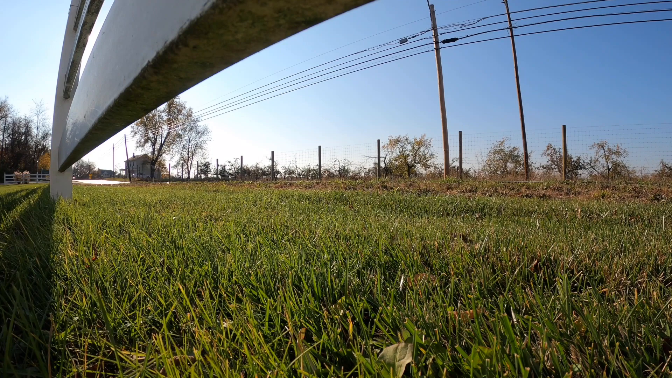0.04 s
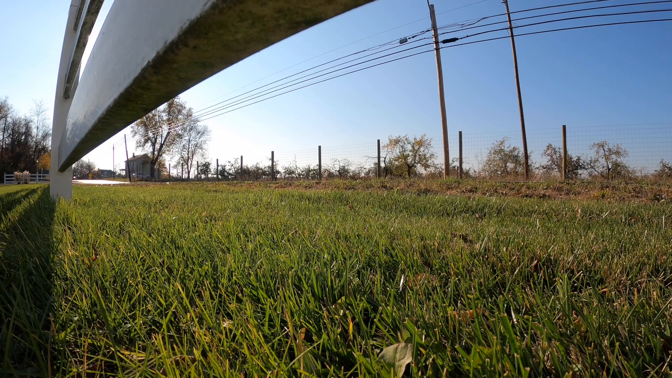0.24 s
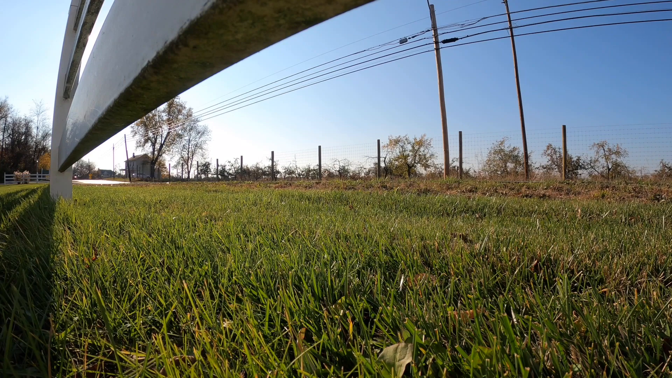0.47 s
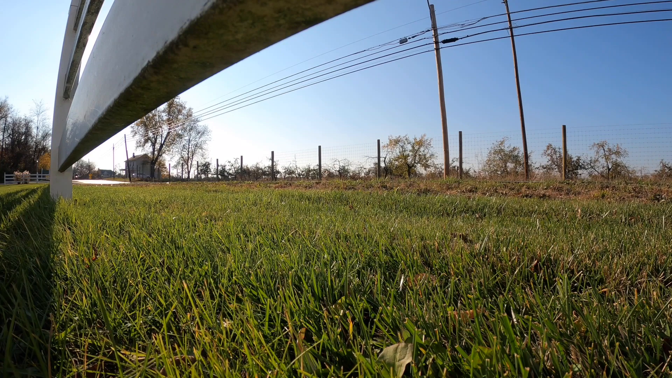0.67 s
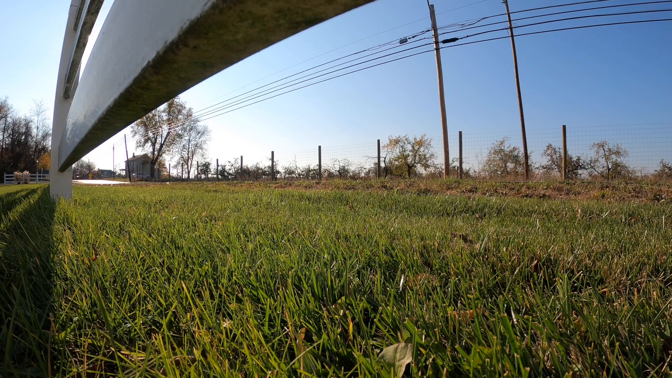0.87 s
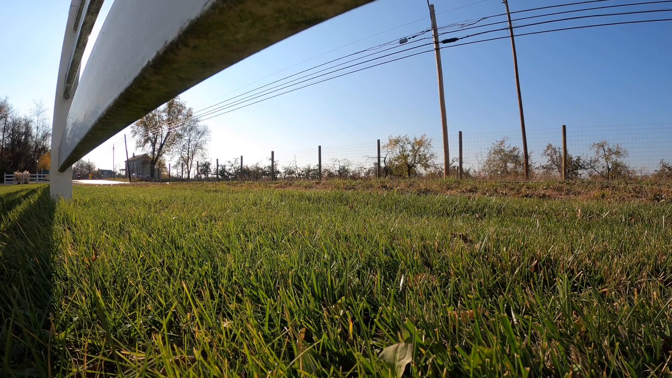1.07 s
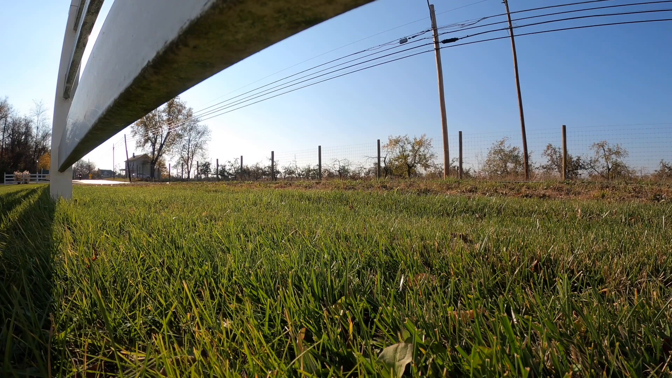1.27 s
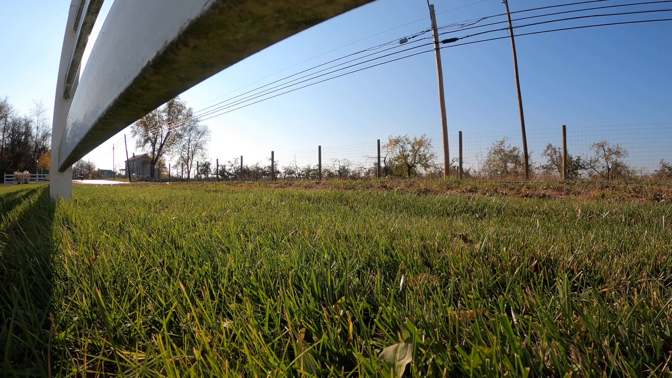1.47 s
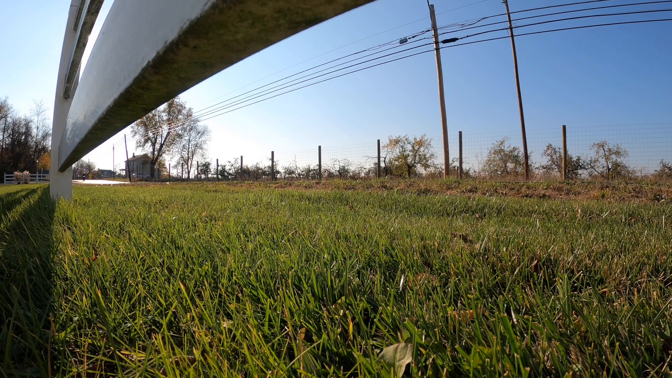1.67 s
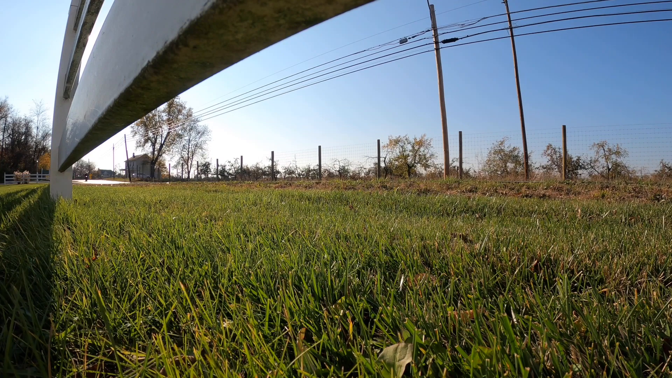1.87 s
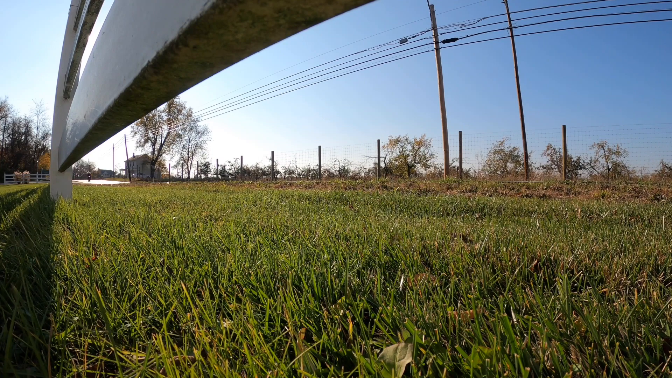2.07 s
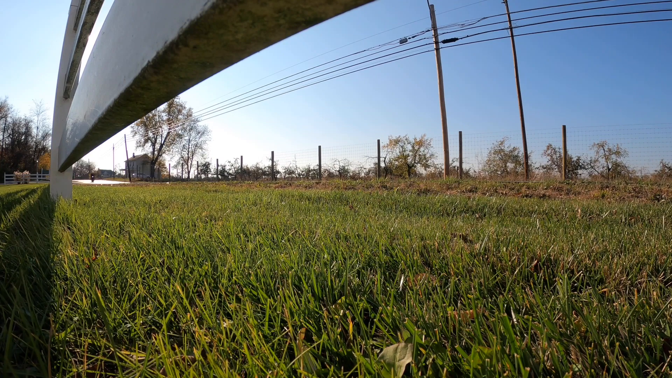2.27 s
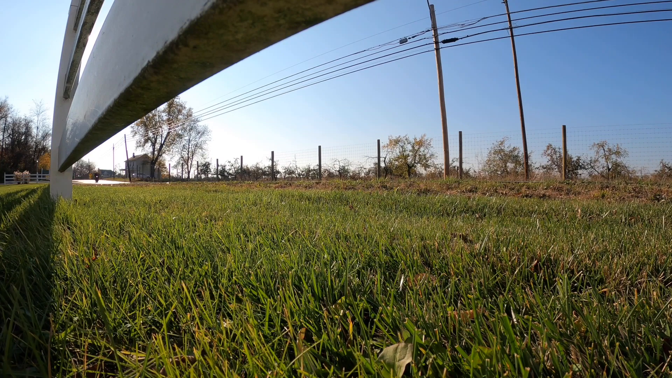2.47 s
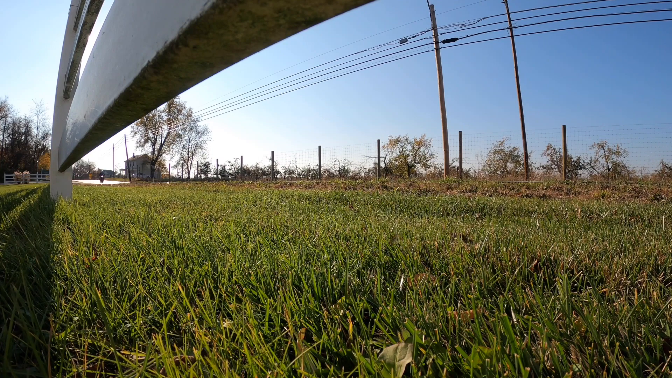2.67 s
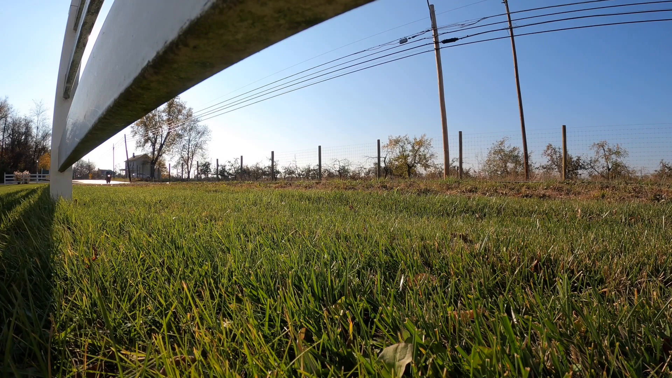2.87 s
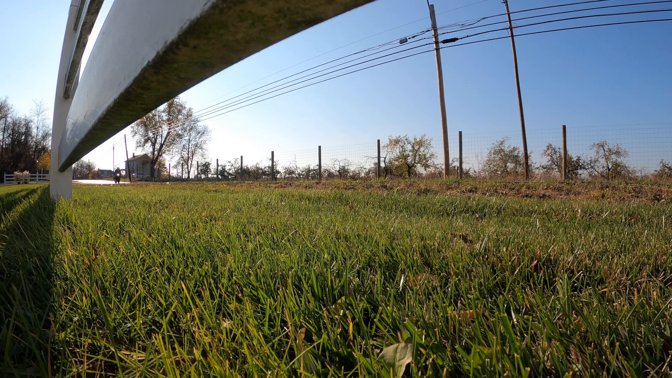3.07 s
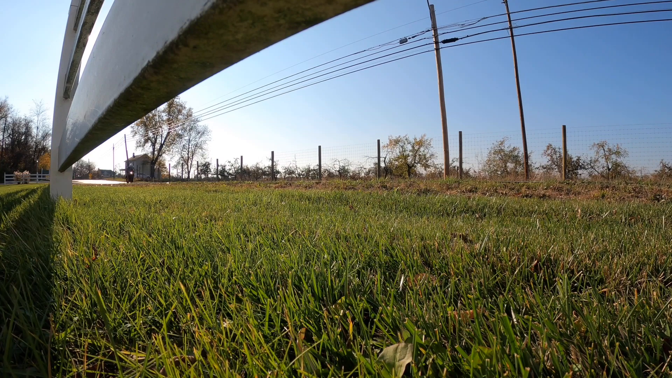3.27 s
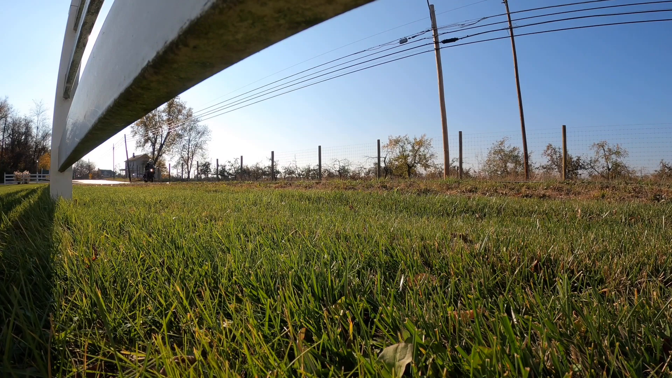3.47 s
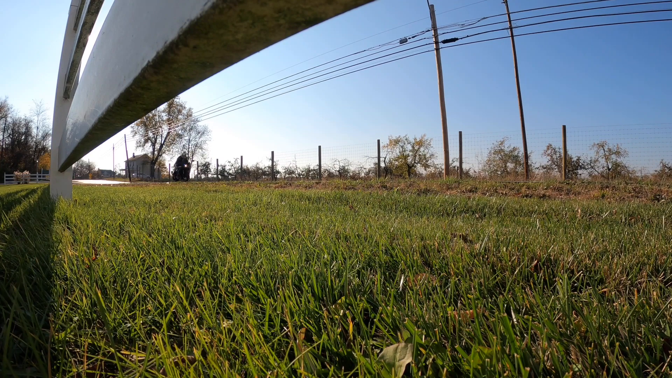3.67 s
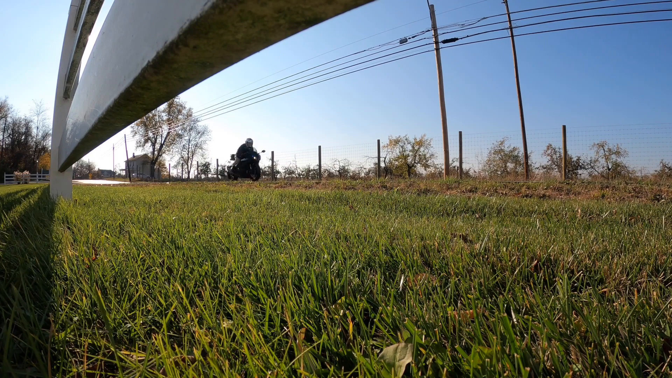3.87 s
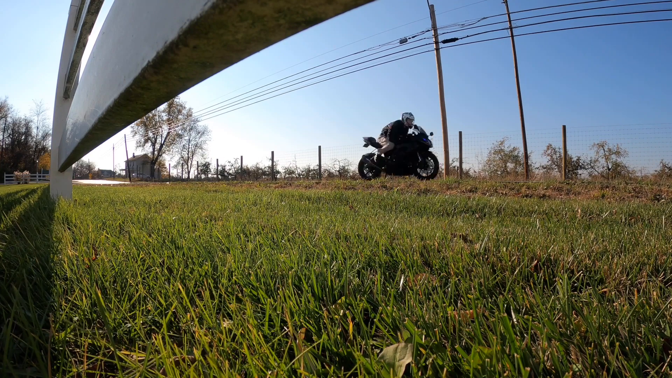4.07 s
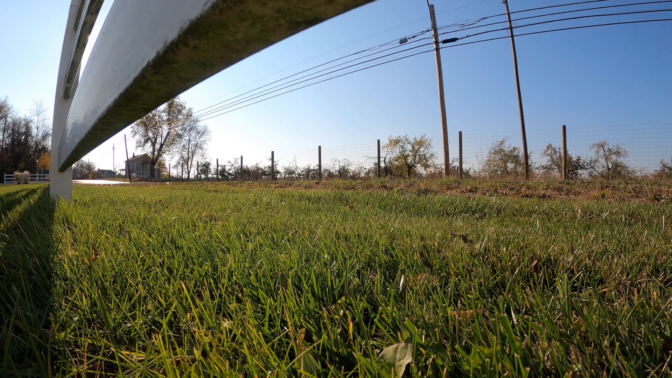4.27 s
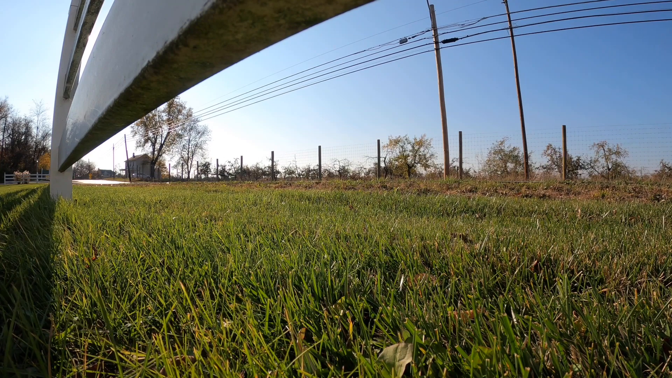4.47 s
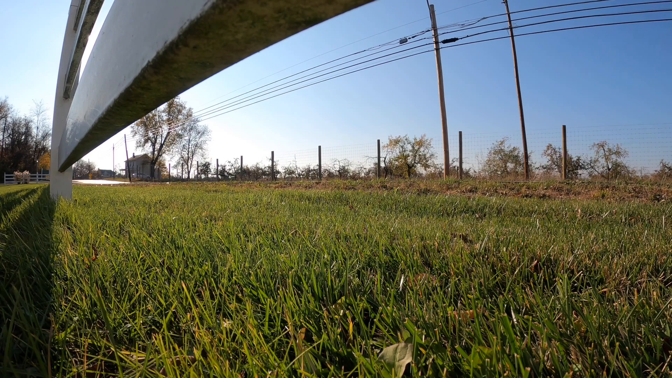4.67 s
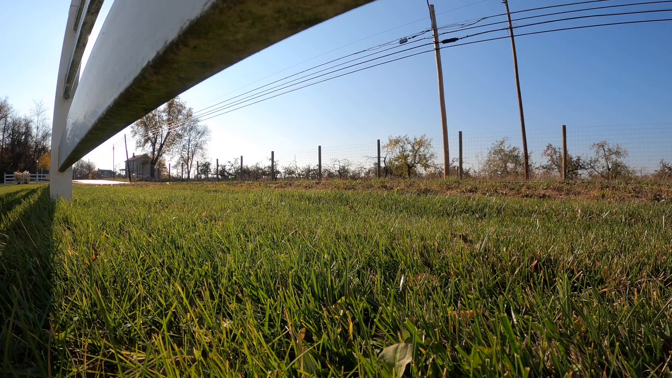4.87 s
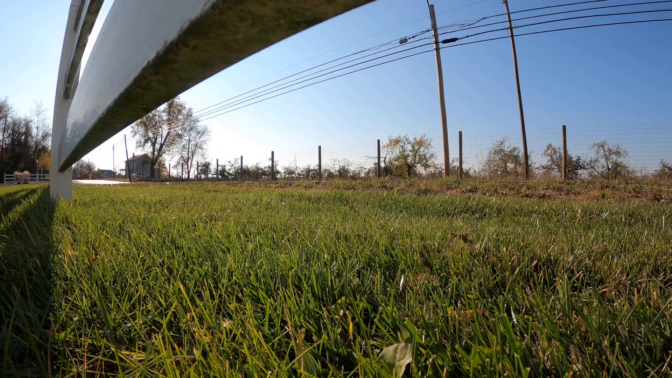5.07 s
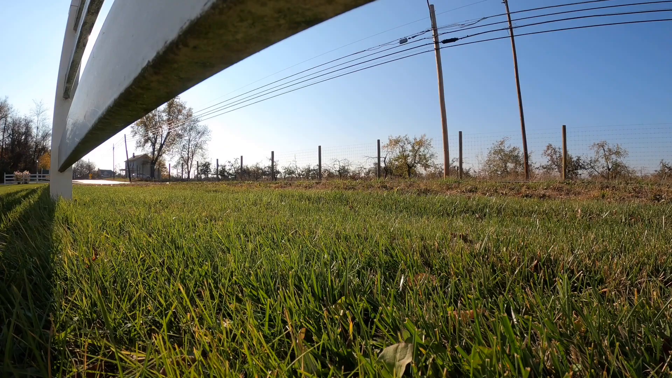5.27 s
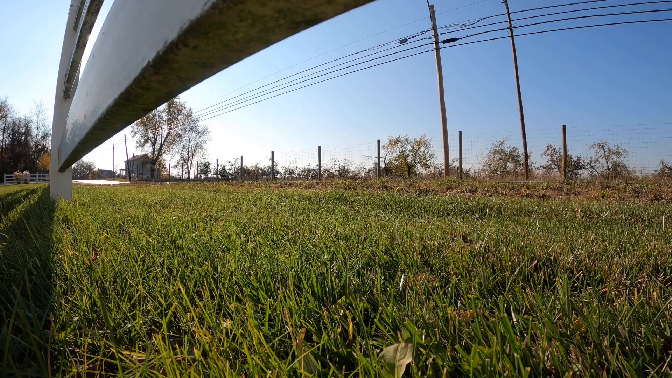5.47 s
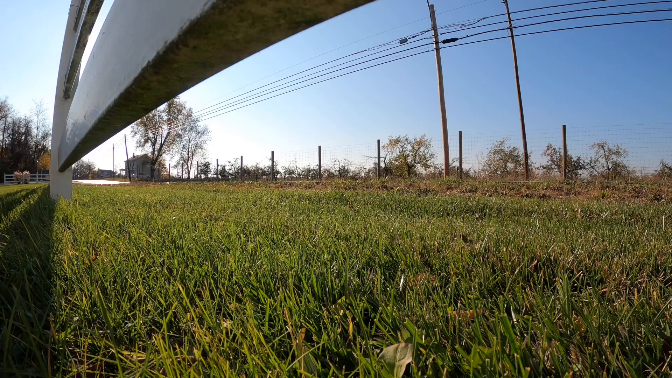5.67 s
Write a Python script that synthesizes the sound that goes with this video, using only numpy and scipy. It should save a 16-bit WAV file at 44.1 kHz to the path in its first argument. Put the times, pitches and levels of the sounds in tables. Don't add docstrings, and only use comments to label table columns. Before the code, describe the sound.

A mono outdoor pass-by heard from grass beside a rural road. From 0 to 2 seconds, low wind rumble, fluttering gusts and small pops press on the dull microphone, while a faint, smooth motorcycle hum climbs steadily in pitch and grows. At about 2.35 seconds a quick upshift dips the power and the revs twitch; a stronger wind pop lands near 2.8. The tone swells, nearly pure and singing, with another shift at 3.25. Tyre hiss, intake roar and a high chain whine rise sharply around 4. At 4.05 a deep ignition cut, short metallic ring, thud and jerk of revs mark a hard shift just before the closest pass at 4.3. Pitch and whine fall as the bike passes; coarse exhaust rasp follows. The hiss drops away quickly, the lower engine note fades, a final clipped shift comes at 5.27, and the receding drone continues to 5.7 under light wind.

```python
import sys
import numpy as np
from scipy import signal
from scipy.io import wavfile
from scipy.ndimage import uniform_filter1d

SR = 44100
rng = np.random.default_rng(int(sys.argv[2]) if len(sys.argv) > 2 else 0)


def volts_from_db(level):
    exponent = np.asarray(level, float) / 20
    return 10 ** exponent


def put_to_file(sound):
    columns = np.atleast_2d(sound).T
    safe = np.clip(columns, -1, 1)
    whole_steps = np.round(safe * 32767)
    wavfile.write(sys.argv[1], SR, whole_steps.astype(np.int16))


N = 252693

# time in seconds, rate in Hz.
ROAD_SPEED = [(0, 168.7), (.36, 173.1), (.72, 179.5), (1.08, 188.8), (1.44, 202.7), (1.8, 223),
              (2.05, 241.2), (2.35, 260.3), (2.55, 262.6), (3.24, 298.3), (3.4, 299.8), (3.7, 311.5),
              (4.04, 323.6), (4.3, 327.3), (4.7, 330.8), (5.1, 336), (5.265, 346.5), (5.73, 351.4)]
# start in seconds, ratio of new to old revs.
UPSHIFTS = [
    (2.35, 0.88),
    (3.24, 0.88),
    (4.04, .887),
    (5.265, .904),
]
SHIFT_S = .045
# peak in seconds, rate change in Hz, settling in seconds.
SNATCHES = [
    (2.421, 33, .024),
    (2.486, -16, 0.02975),
    (3.301, 23, 0.0181),
    (3.346, -11, .025),
    (4.101, 43.5, .02),
    (4.162, -13.5, .015),
    (5.322, -20.5, 0.0059),
    (5.342, 24, 0.0078),
]
# time in seconds, depth in dB, recovery in seconds.
POWER_CUTS = [
    (2.351, -9, 0.019),
    (2.541, -5, 0.017),
    (3.242, -5, 0.015),
    (4.041, -16, 0.032),
    (4.128, -5, 0.047),
    (4.147, -4, 0.021),
    (4.35, -1.5, 0.032),
    (5.267, -16, 0.026),
]

PASS_S, PASS_SPAN_S, MACH = 4.32, 0.14, .07
BEAM_S, BEAM_SPAN_S = 4.416, 0.34
ABREAST_S, TURN_S, CHAIN_S = 4.017, 0.041, 4.195

# time in seconds, level in dB.
FIRING_TONE = [(0, -35), (.28, -32.5), (.8, -29.5), (1.2, -25.5), (1.6, -25), (2.0, -20), (2.25, -18),
               (2.55, -18), (2.75, -19), (2.84, -14), (2.95, -13), (3.4, -12), (4.08, -10.5), (4.45, -11),
               (4.65, -14.5), (4.87, -17.5), (5.2, -22), (5.73, -23)]
EXHAUST_ORDERS = np.array([2, 3, 5, 6, 7, 8, 9, 10, 11, 12, 13, 14, 15, 16, 18, 20, 22, 24, 28]) / 4
ORDER_FRONT_DB = [-16.5, -1.5, -0.5, -1, -15.5, -1.5, -27.5, -20, -29, 3, -17, -14, -21, -4.5, -10, -4.5,
                  -18.5, -8, -19.5]
ORDER_REAR_DB = [-9.5, -16, -3, -3, -19.5, -0.5, -13, -11.5, -21, 1.5, -9, -19.5, -15.5, -36, -29.5, -23,
                 -30, -28, -23.5]
# dB nearest from the front, share of distance loss, dB in the tailpipe's beam, share of beam loss
UNEVEN, SECOND, UPPER = (-32, 0.56, -26.5, 1.43), (-44.5, 0.04, -25, 3), (-37.5, 1.1, -37.5, 2.5)
# centre in seconds, gain in dB, length in seconds.
SECOND_BEATS = [
    (0.904, 3, .25),
    (2.9, 4, .15),
    (4.03, 9.5, 0.084),
    (4.149, 7, 0.03),
    (4.522, 3.5, 0.048),
    (5.219, -13.5, .12),
    (5.5, 10.5, 0.18),
]
# centre in seconds, gain in dB, length in seconds.
UPPER_ORDER_BEATS = [
    (1.653, 8.5, 0.13),
    (1.95, 4.5, 0.064),
    (2.26, 9, 0.074),
    (2.754, 2.5, .1),
    (3.1, 2.5, 0.14),
    (4.32, 3, 0.052),
    (5.15, 2.5, .05),
    (5.5, 5, 0.13),
]
RELIGHT_DB, RELIGHT_S, RELIGHT_SPAN_S = -8, .06, .045
RASP_DB, RASP_SHARE, RASP_LOW_HZ, RASP_HIGH_HZ = -46, 1.97, 330, 788

# time in seconds, level in dB.
RUNNING_NOISE = [(0, -69.5), (.35, -68), (.83, -66.5), (1.5, -58), (2.68, -55.5), (2.86, -50.5),
                 (3.05, -52), (3.7, -51), (3.91, -45.5), (4.04, -41.5), (4.12, -35.5), (4.3, -35.5),
                 (4.55, -42.5), (4.79, -55), (5.26, -58.5), (5.31, -63.5), (5.5, -61), (5.73, -60.5)]
# frequency in Hz, level in dB per Hz.
RUNNING_COLOUR = [(290, -31.5), (500, -8.5), (723, -11.5), (1120, -13.5), (1240, -10.5), (1490, -14),
                  (1840, -10.5), (2150, -20), (2740, -15), (3150, -18.5), (4820, -20.5), (7700, -30),
                  (14800, -74.5)]
LOW_NEAR_DB, LOW_FAR_DB, LOW_SLOPE = -19.5, 0.5, 1
MID_FRONT_DB, MID_REAR_DB = -1.5, -3.5
TREBLE_DB, TREBLE_SLOPE = 1, 0.34
# centre in seconds, gain in dB, length in seconds.
INTAKE_ROAR = [(.05, 12.5, .15), (.95, -9, .22), (1.4, 6, 0.28), (1.948, 3, .25), (2.6, 6.5, 0.36),
               (2.819, 6, 0.061), (2.993, 3.5, 0.17), (3.5, 5.5, .15), (4.171, 10, 0.048), (4.8, 0, 0.098),
               (5.197, -2.5, 0.12), (5.6, 0.5, .2)]
# frequency in Hz, width in Hz, share added.
FAIRING_CAVITIES = [(1875, 260, 0.72), (1464, 230, -0.48), (3740, 130, 0.22)]
# time in seconds, pitch in
# Hz.
WHINE_PITCH = [(0, 3450), (1.2, 3900), (2.3, 4750), (2.8, 4900), (4.0, 4950), (4.18, 4700), (4.45, 4200),
               (5.73, 4180)]
# multiple of its pitch, width in Hz, front level in dB, rear level in dB.
WHINE_BANDS = [(1, 260, -8, -3.5), (1.07, 170, -18, -10.5), (.78, 240, -16.5, -6), (.55, 230, -14.5, -12.5),
               (.4, 110, -14.5, -14), (1.19, 77, -27.5, -15), (.93, 83, -19.5, -7.5), (.72, 52, -23, -17),
               (.64, 60, -21.5, -19)]

# start in seconds, level in dB, pitch in Hz, length in seconds.
DOG_CLANG = [
    (4.034, -36, 995, 0.063),
]
# start in seconds, peak in dB, start pitch in Hz, end pitch in Hz, length in seconds.
PORT_POPS = [(0.622, -37, 146, 302, 0.015), (0.798, -31, 200, 420, 0.012), (0.855, -31, 202, 503, 0.014),
             (0.884, -31, 200, 420, .016), (0.912, -32, 178, 425, 0.047), (1.011, -33, 203, 554, 0.004),
             (1.09, -32.5, 304, 600, 0.009), (1.094, -41, 120, 450, 0.01), (1.179, -21.5, 176, 330, 0.013),
             (1.188, -23.5, 442, 850, 0.012), (1.199, -37, 480, 800, 0.016), (1.248, -36, 617, 900, 0.013),
             (1.225, -26.5, 280, 560, 0.026), (1.451, -34, 199.5, 400, 0.018), (2.036, -27, 98, 400, 0.012),
             (2.786, -23, 131, 262, 0.017), (2.794, -12.5, 121.7, 750, 0.027),
             (4.059, -15.5, 189, 137, 0.045)]
# time in seconds, level in dB.
BREEZE = [(0, -30.5), (1.0, -35.5), (2.2, -41), (3.4, -31), (4.2, -38.5), (5.73, -38)]
# peak in seconds, peak level in dB, length in seconds.
WIND_GUSTS = [(0.199, -24, 0.015), (0.352, -34, 0.054), (0.56, -46, 0.028), (0.629, -23.5, 0.034),
              (0.75, -24, 0.069), (0.921, -22, 0.082), (1.134, -24.5, .1), (1.3, -29.5, 0.21),
              (1.509, -28.5, .06), (1.79, -27, 0.16), (1.894, -25, .04), (2.051, -24, 0.097),
              (2.243, -31, 0.073), (2.417, -28, 0.028), (2.515, -33, 0.016), (2.799, -19.5, 0.023),
              (3.052, -32.5, 0.065), (3.14, -26, .03), (3.46, -36, 0.046), (3.33, -26.5, 0.053),
              (3.62, -29.5, .06), (3.75, -35.5, 0.035), (4.18, -30.5, .04), (4.819, -32, 0.075),
              (5.024, -31, .07), (5.45, -37.5, 0.1), (5.63, -36, .03)]
# frequency in Hz, level in dB per Hz.
RUMBLE_COLOUR = [(15, -4.5), (30, -3), (65, 0.5), (110, -4.5), (170, -5.5), (260, -12.5)]
# frequency in Hz, level in dB per Hz.
FLUTTER_COLOUR = [(120, -11.5), (200, -3), (350, -7), (550, -18), (900, -30), (1500, -43)]
GUST_RISE, FLUTTER_DB = .6, -21
AUDIBLE_DB, AUDIBLE_ABOVE_HZ = -107.5, 7800


def rms_one(x):
    return x / np.sqrt(np.mean(x ** 2) + 1e-20)


def in_time(rows):
    s, *columns = np.transpose(rows)
    return [np.interp(np.arange(N) / SR, s, c) for c in columns]


def drift(rate):
    r = np.exp(-80 * np.pi * rate / SR)
    slow = signal.lfilter([1], [1, -2 * r, r * r], rng.standard_normal(N // 40 + 2002))[2000:]
    return np.interp(np.arange(N) / 40, np.arange(len(slow)), rms_one(slow))


def band_noise(low, high):
    sos = signal.butter(4, [low, high], "band", fs=SR, output="sos")
    return rms_one(signal.sosfilt(sos, rng.standard_normal(N)))


def bands(colour, patchy_db, rate):
    hz_at, db_at = np.transpose(colour)
    edges = hz_at[0] * 2 ** np.arange(0, np.log2(hz_at[-1] / hz_at[0]) + .1, 1 / 3)
    white = rng.standard_normal((2, N + SR // 4))
    together = drift(rate)
    for k, (low, high) in enumerate(zip(edges, edges[1:])):
        hz = np.sqrt(low * high)
        sos = signal.butter(2, [low, high], "band", fs=SR, output="sos")
        noise = signal.sosfilt(sos, white[k % 2])[-N:]
        flicker_db = patchy_db * (together + 0.78 * drift(rate))
        yield hz, noise * volts_from_db(np.interp(np.log(hz), np.log(hz_at), db_at) + flicker_db)


def loss_db(t, s, span):
    return -10 * np.log10(1 + ((t - s) / span) ** 2)


def swells(t, rows):
    return sum(db * np.exp(-((t - s) / length) ** 2) for s, db, length in rows)


def crank(t):
    rate, = in_time(ROAD_SPEED)
    for s, ratio in UPSHIFTS:
        rate = rate * ratio ** np.clip((t - s) / SHIFT_S, 0, 1)
    rate = rate / (1 + MACH * (t - PASS_S) / np.hypot(t - PASS_S, PASS_SPAN_S))
    for s, hz, settling in SNATCHES:
        width = np.where(t < s, .4 * settling, settling)
        rate = rate + hz * np.exp(-.5 * ((t - s) / width) ** 2)
    rate = rate + 0.5 * drift(25)
    return 2 * np.pi * np.cumsum(rate) / SR


def power(t):
    return sum(db * np.exp(-((t - s) / np.where(t < s, 0.11 * back, back)) ** 2)
               for s, db, back in POWER_CUTS)


def exhaust(t, phase, rear):
    firing_db, = in_time(FIRING_TONE)
    distance_db = loss_db(t, PASS_S, PASS_SPAN_S)
    beam_db = loss_db(t, BEAM_S, BEAM_SPAN_S)
    uneven_db, second_db, upper_db = (
        (1 - rear) * (front_db + share * distance_db) + rear * (rear_db + beam * beam_db)
        for front_db, share, rear_db, beam in (UNEVEN, SECOND, UPPER))
    relights = [(s + RELIGHT_S, RELIGHT_DB, RELIGHT_SPAN_S) for s, ratio in UPSHIFTS]
    second_db = second_db + swells(t, SECOND_BEATS)
    upper_db = upper_db + swells(t, UPPER_ORDER_BEATS) + swells(t, relights)

    lost_db = power(t)
    misfire = (1 - volts_from_db(lost_db)) ** 2 * (.25 * drift(90) + .25 * np.sin(phase / 2 + 1.5))
    out = volts_from_db(firing_db) * (volts_from_db(lost_db + .5 * drift(46)) + misfire) * np.sin(phase)

    far_db = firing_db + 13.0
    wander = .06 * drift(12)
    for order, front_db, rear_db in zip(EXHAUST_ORDERS, ORDER_FRONT_DB, ORDER_REAR_DB):
        main = order in (1.5, 2, 3)
        curve_db = second_db if order == 2 else uneven_db if order < 3 else upper_db
        fading_db = (1.5 if main else 4.5) * np.minimum(drift(5.0), .8) + 2.0 * drift(23)
        level_db = curve_db + front_db + (rear_db - front_db) * rear + fading_db
        level_db += (0.19 * order if order > 2 else .3 - .5 * rear) * lost_db
        if order > 2 and not main:
            level_db += .8 * far_db
        spread = 1.55 * order ** 2
        out += volts_from_db(level_db) * np.sin(order * (phase + wander) - spread + 0.9 * drift(1.6))
    return -np.sqrt(2) * out


def rasp(t, phase, rear):
    gas = band_noise(RASP_LOW_HZ, RASP_HIGH_HZ)
    level_db = RASP_DB + RASP_SHARE * loss_db(t, BEAM_S, BEAM_SPAN_S) + 2.9 * drift(9.2)
    return rear * volts_from_db(level_db) * (1 + 0.67 * np.sin(phase / 2)) * gas


def whine(t, level_db):
    phase = 2 * np.pi * np.cumsum(in_time(WHINE_PITCH)[0]) / SR
    chain_side = 1 / (1 + np.exp(-(t - CHAIN_S) / TURN_S))
    out = np.zeros(N)
    for multiple, width, front_db, rear_db in WHINE_BANDS:
        sos = signal.butter(2, width / 2, fs=SR, output="sos")
        blur = rms_one(signal.sosfilt(sos, rng.standard_normal(N)))
        band_db = front_db + (rear_db - front_db) * chain_side + 1.9 * drift(9.8)
        band_db += 0.029 * (level_db + 44.5)
        out += volts_from_db(band_db) * blur * np.sin(multiple * phase)
    return out


def running_noise(t, phase, rear):
    level_db, = in_time(RUNNING_NOISE)
    below_db = level_db - level_db.max()
    low_db = np.minimum(LOW_NEAR_DB - LOW_SLOPE * below_db, LOW_FAR_DB) + swells(t, INTAKE_ROAR)
    mid_db = MID_FRONT_DB + (MID_REAR_DB - MID_FRONT_DB) * rear
    treble_db = TREBLE_DB + TREBLE_SLOPE * below_db * (1 - rear)
    out = np.zeros(N)
    for hz, band in bands(RUNNING_COLOUR, patchy_db=0.86, rate=6.3):
        octave = np.log2(hz / 1000)
        low = np.interp(octave, [0, 1], [1, 0])
        mid = np.interp(octave, [0, 1, 2], [0, 1, 0])
        high = np.interp(octave, [2, 3, 4], [0, 1, 2.5])
        out += band * volts_from_db(low * low_db + mid * mid_db + high * treble_db)
    cavities = sum(share * signal.lfilter(*signal.iirpeak(hz, hz / width, fs=SR), out)
                   for hz, width, share in FAIRING_CAVITIES)
    out = volts_from_db(26.5) * (out + (1 - rear) * cavities) + whine(t, level_db)
    return volts_from_db(level_db) * out * (1 + 0.042 * np.sin(phase / 2))


def clang(t):
    out = np.zeros(N)
    for s, db, hz, length in DOG_CLANG:
        u = np.clip((t - s) / length, 0, 1)
        out += volts_from_db(db) * np.sin(np.pi * u ** 2) ** 2 * np.sin(2 * np.pi * hz * t)
    return out


def pops(t):
    out = np.zeros(N)
    puff = band_noise(350, 950)
    puff += volts_from_db(-33.5) * rng.standard_normal(N)
    for s, db, start_hz, end_hz, length in PORT_POPS:
        u = np.clip((t - s) / length, 0, 1)
        ratio = end_hz / start_hz
        turns = length * start_hz * (ratio ** u - 1) / np.log(ratio)
        sweep = volts_from_db(db - 9 * u) * np.sin(2 * np.pi * turns)
        out += np.sin(np.pi * u) ** 2 * (sweep + volts_from_db(db - 22) * puff)
    return out


def wind(t):
    blow = volts_from_db(2 * in_time(BREEZE)[0])
    for s, db, length in WIND_GUSTS:
        blow = blow + volts_from_db(2 * db) * np.exp(-((t - s) / np.where(t < s, GUST_RISE * length, length)) ** 2)
    rumble = rms_one(sum(band for hz, band in bands(RUMBLE_COLOUR, patchy_db=0.5, rate=17)))
    flutter = rms_one(sum(band for hz, band in bands(FLUTTER_COLOUR, patchy_db=3.5, rate=18)))
    return np.sqrt(blow) * (rumble + volts_from_db(FLUTTER_DB) * flutter)


def scene():
    t = np.arange(N) / SR
    phase = crank(t)
    rear = 1 / (1 + np.exp(-(t - ABREAST_S) / TURN_S))
    bike = exhaust(t, phase, rear) + rasp(t, phase, rear) + running_noise(t, phase, rear) + clang(t)
    return (bike + pops(t) + wind(t))[None]


def low_pass(x):
    return signal.sosfilt(signal.butter(12, 14920, fs=SR, output="sos"), x)


def record(dry):
    padded = np.pad(dry[0], (0, 1024), "reflect")
    hz, _, frames = signal.stft(padded, SR, nperseg=1024, boundary="even")
    band = uniform_filter1d(np.abs(frames) ** 2, size=24, axis=0)
    band = uniform_filter1d(band, size=5, axis=1)
    keep = np.clip(band / volts_from_db(2 * AUDIBLE_DB), 0, 1) ** 8
    frames = frames * np.where(hz[:, None] > AUDIBLE_ABOVE_HZ, keep, 1)
    mix = signal.istft(frames, SR, nperseg=1024)[1][None, :N]
    return low_pass(mix)


dry = scene()
out = record(dry)
put_to_file(out)
```